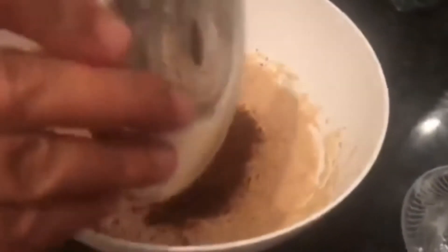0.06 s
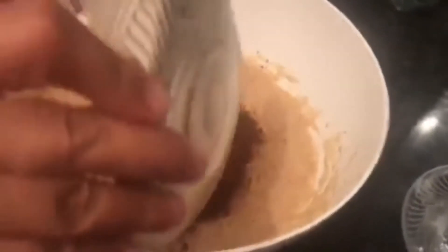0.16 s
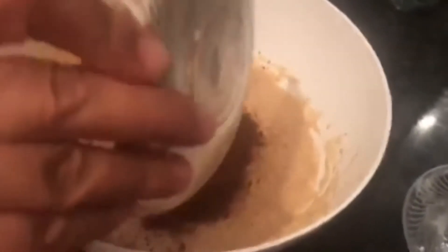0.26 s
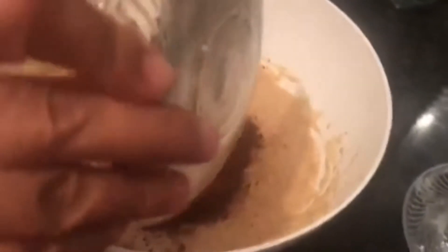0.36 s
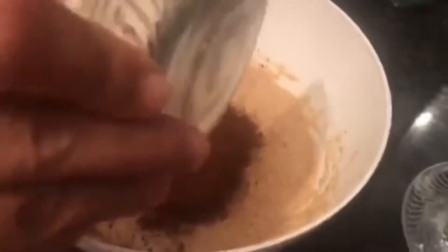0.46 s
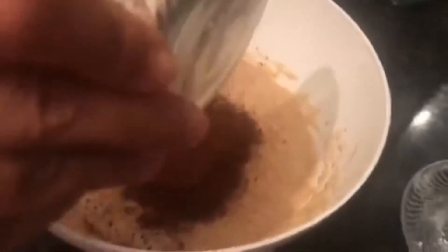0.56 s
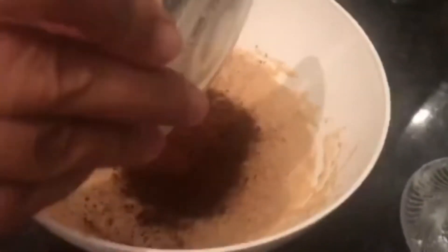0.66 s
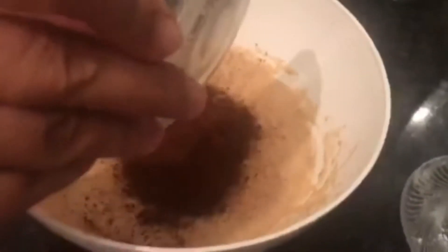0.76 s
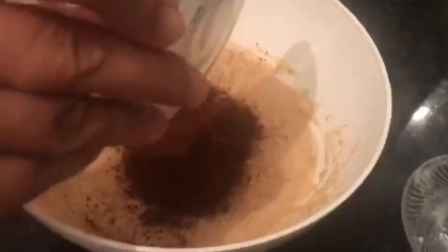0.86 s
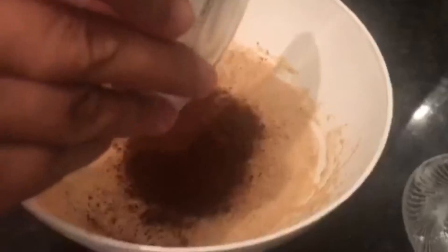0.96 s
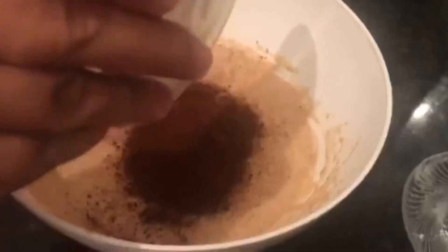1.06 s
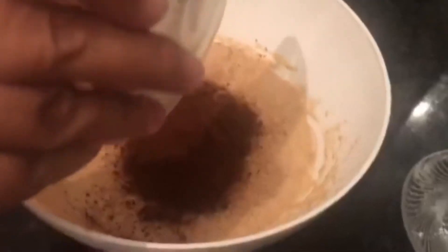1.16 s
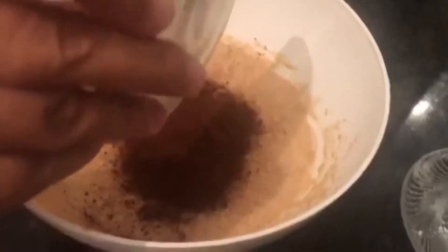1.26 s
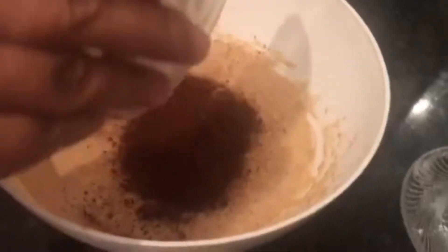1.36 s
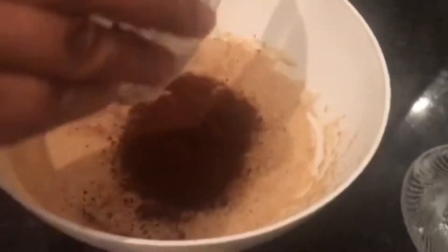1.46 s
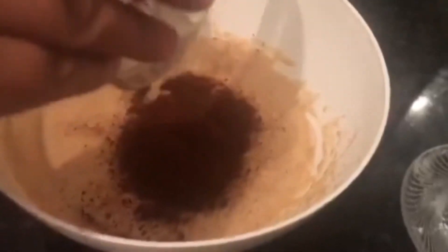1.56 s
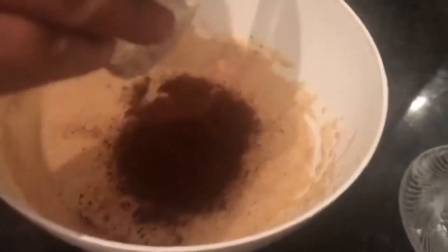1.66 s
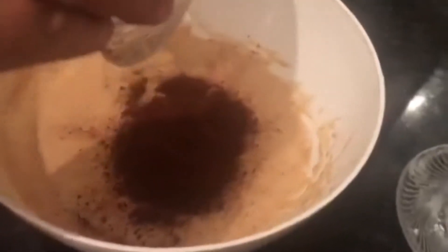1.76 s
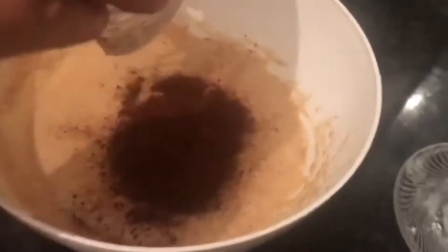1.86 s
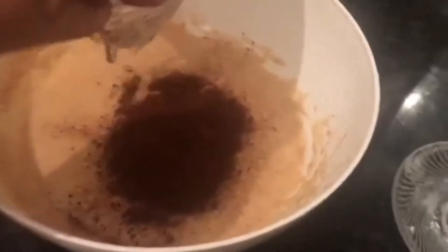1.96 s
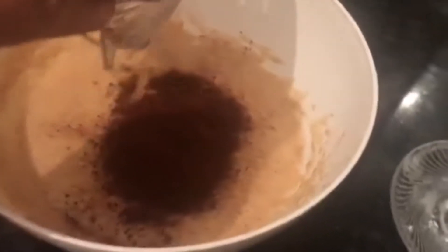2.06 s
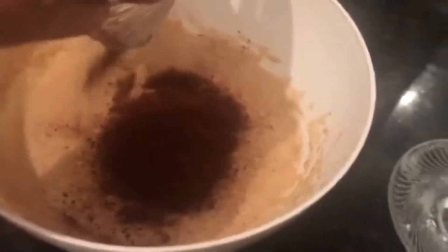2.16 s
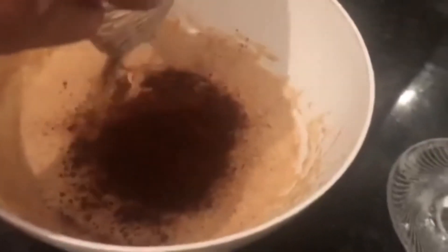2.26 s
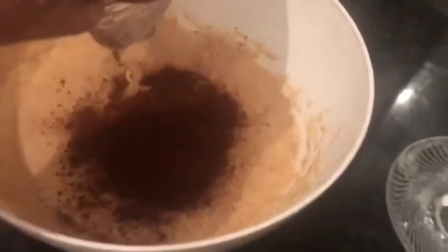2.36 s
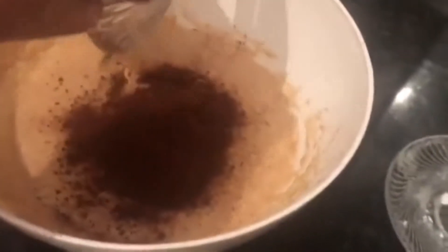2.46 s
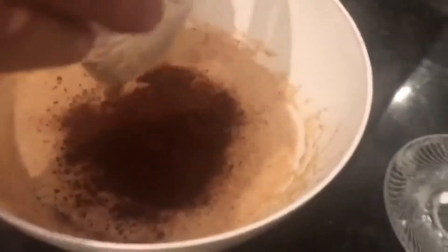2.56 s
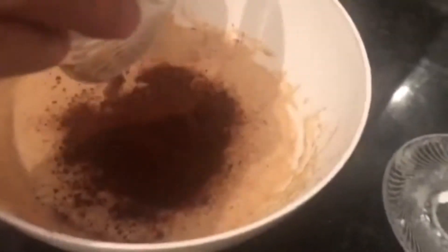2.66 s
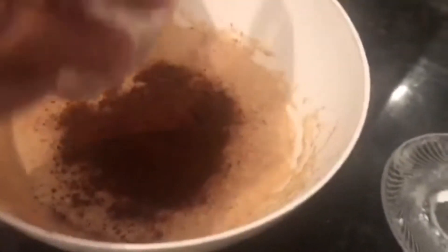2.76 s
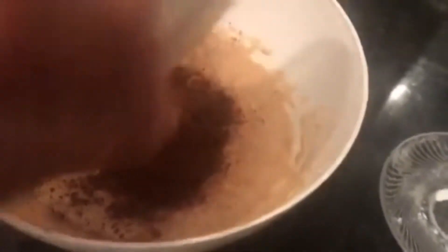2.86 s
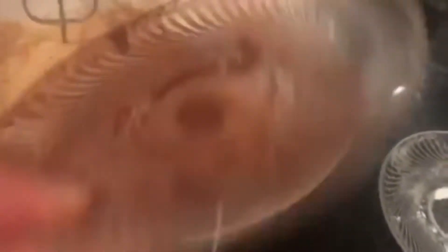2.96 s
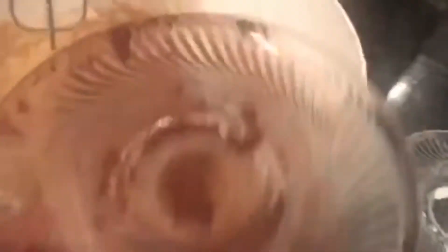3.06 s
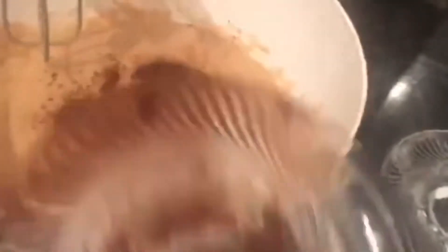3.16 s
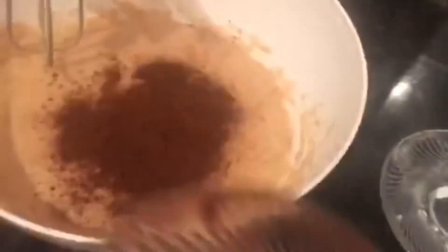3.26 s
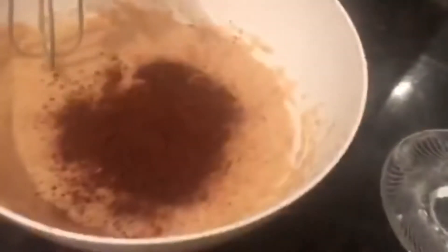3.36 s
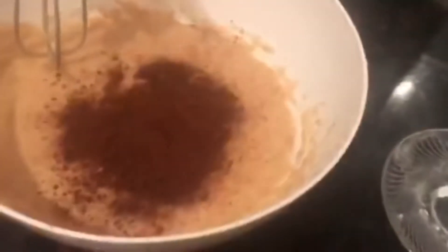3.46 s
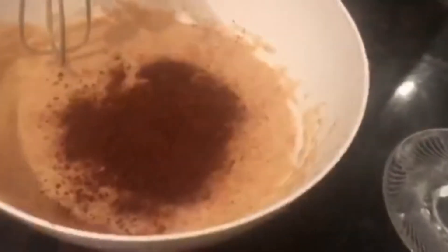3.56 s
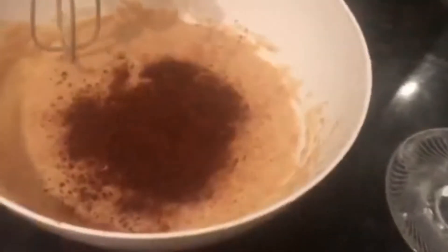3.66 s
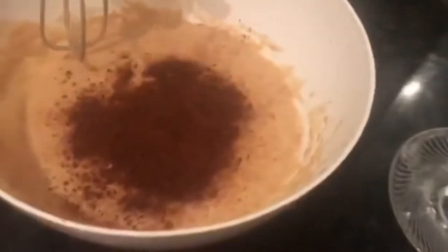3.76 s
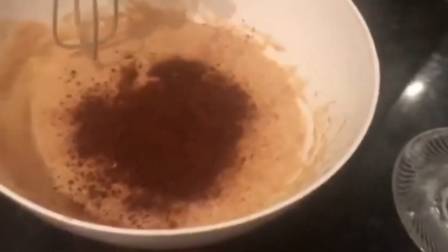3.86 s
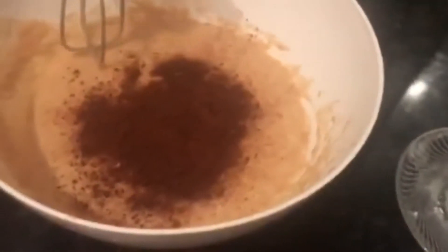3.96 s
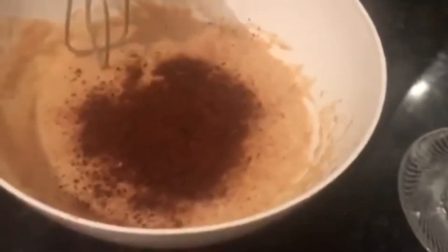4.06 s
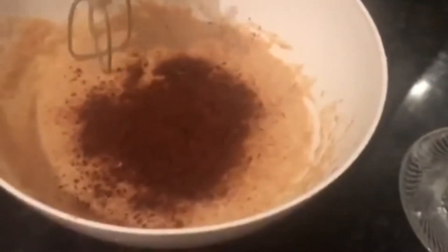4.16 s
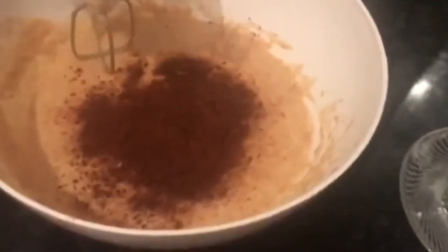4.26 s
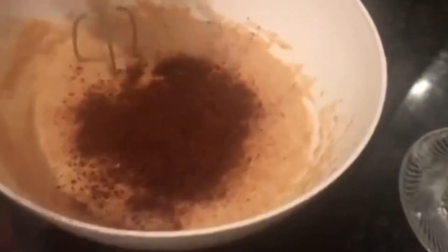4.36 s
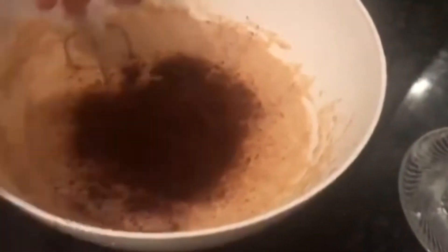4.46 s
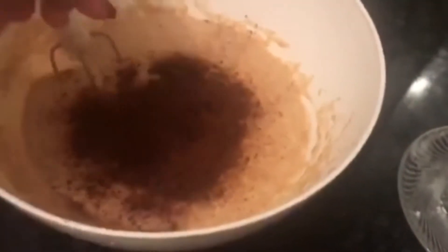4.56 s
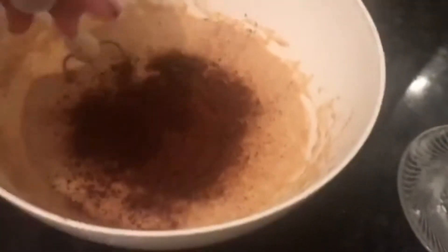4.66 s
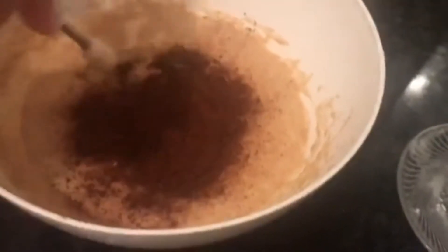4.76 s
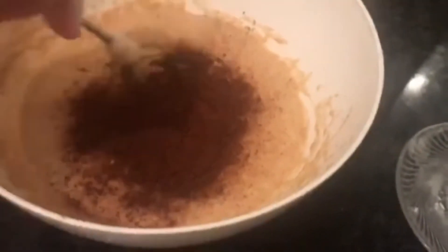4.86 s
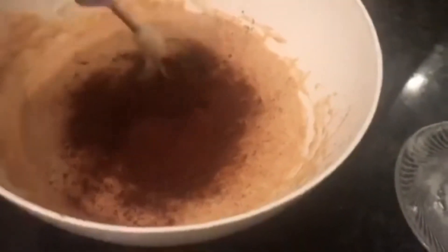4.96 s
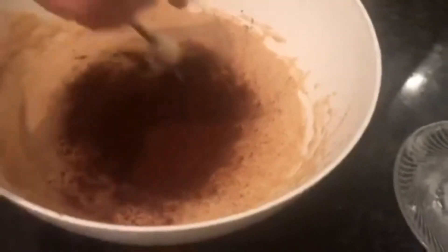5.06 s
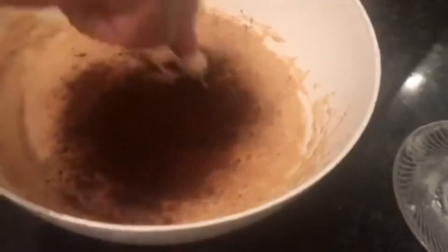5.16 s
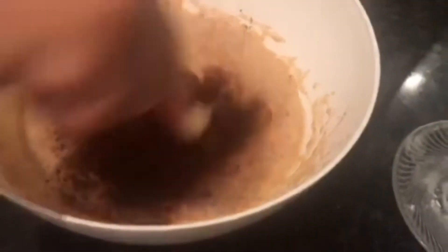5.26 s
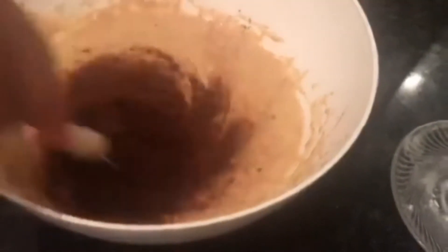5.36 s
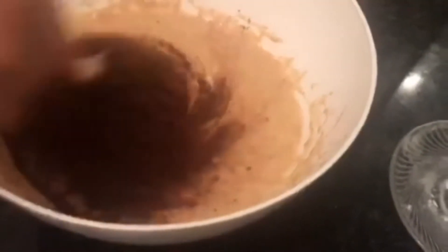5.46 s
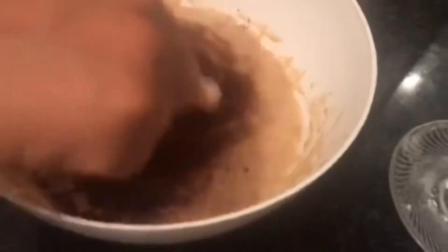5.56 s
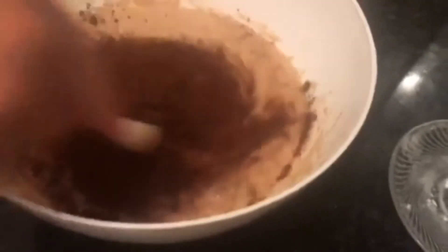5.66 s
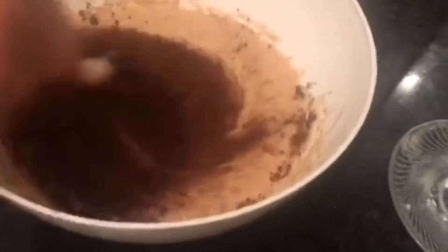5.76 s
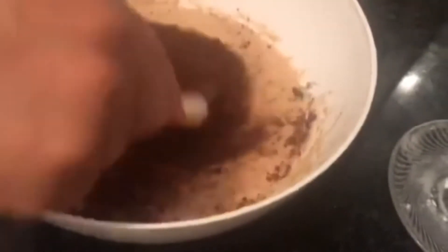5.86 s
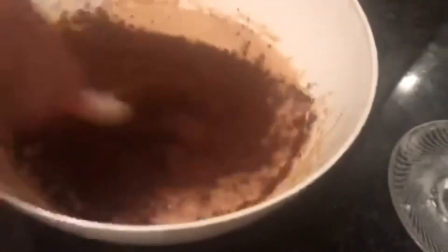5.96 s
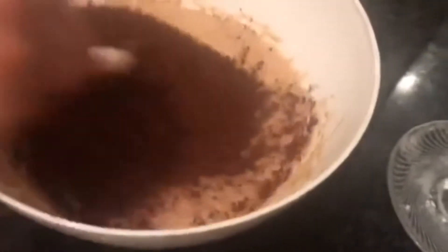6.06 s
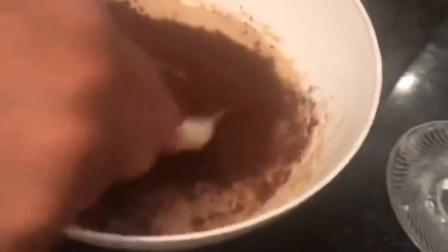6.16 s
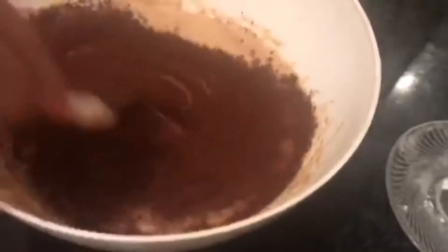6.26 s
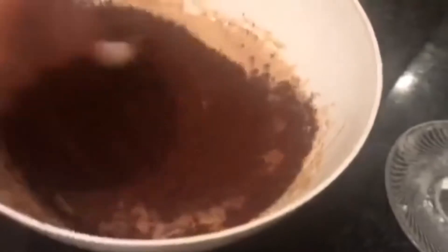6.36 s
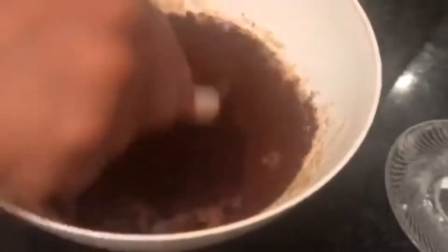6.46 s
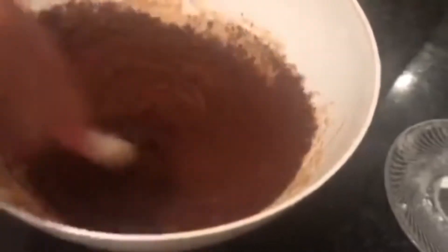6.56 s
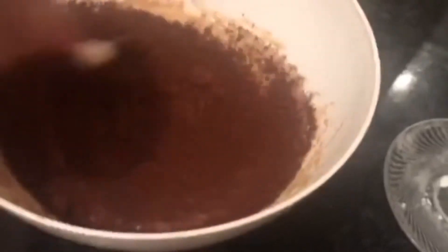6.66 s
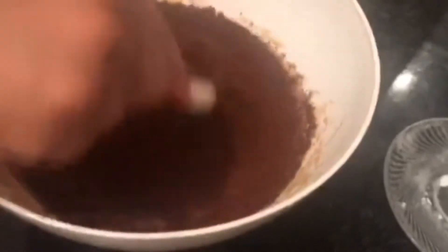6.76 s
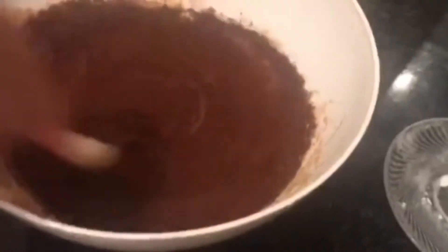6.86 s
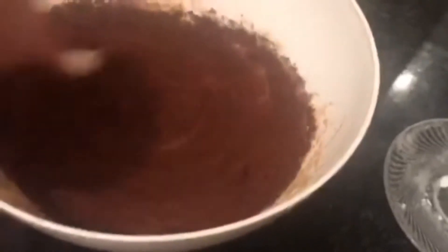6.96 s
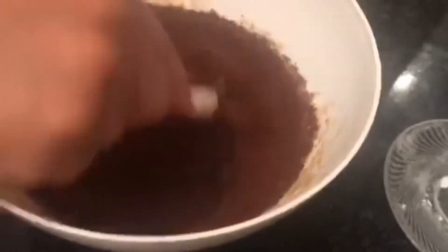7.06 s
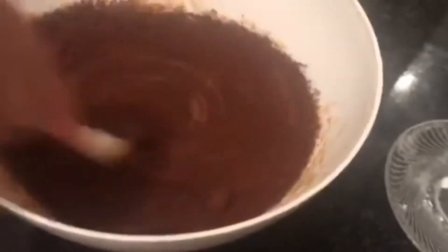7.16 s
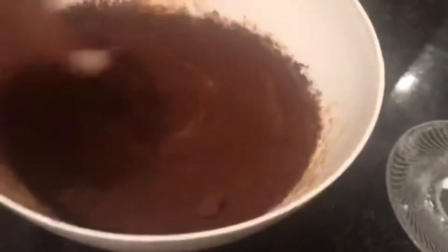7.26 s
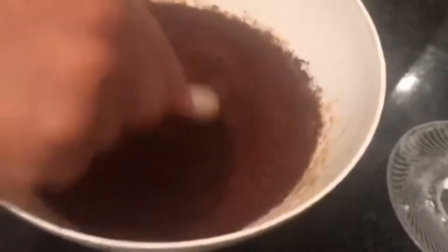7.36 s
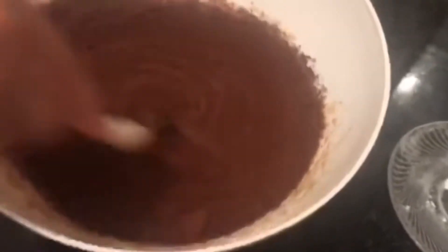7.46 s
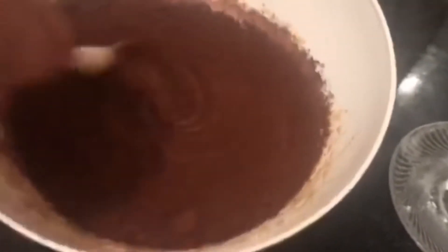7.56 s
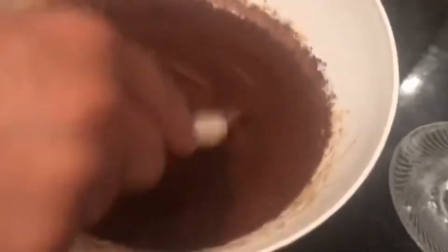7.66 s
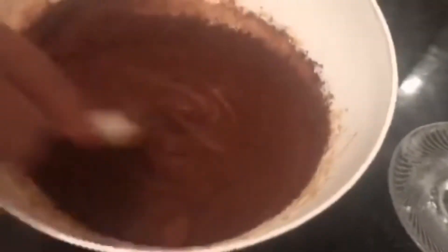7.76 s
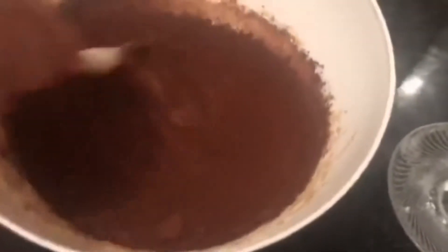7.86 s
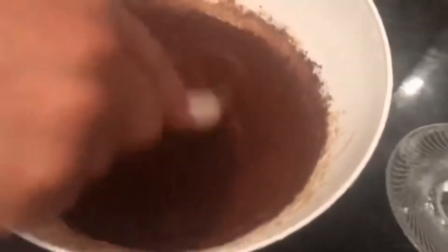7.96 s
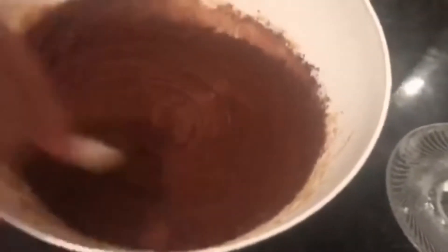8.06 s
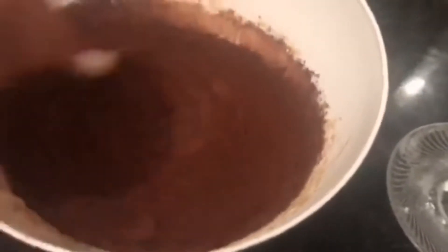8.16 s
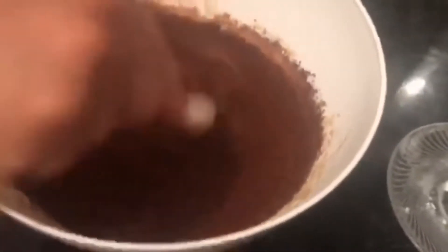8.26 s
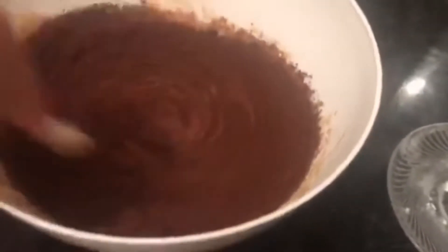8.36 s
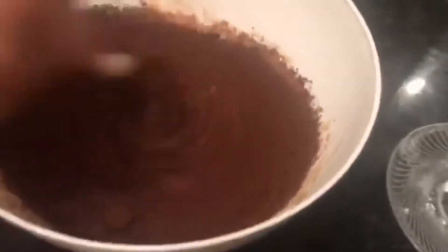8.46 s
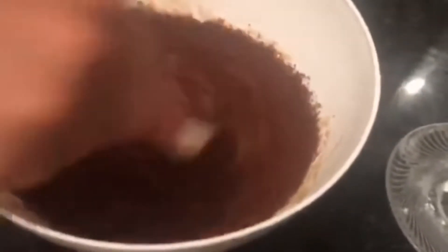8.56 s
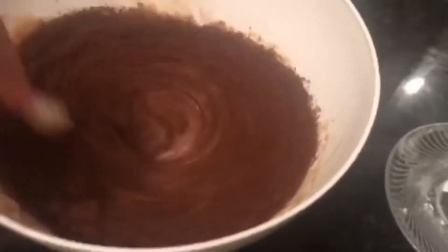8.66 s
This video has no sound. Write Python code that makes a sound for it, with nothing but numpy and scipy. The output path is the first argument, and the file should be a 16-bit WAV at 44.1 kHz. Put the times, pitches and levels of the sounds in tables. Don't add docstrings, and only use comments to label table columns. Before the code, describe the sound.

In a close, hard kitchen, a glass dish rattles brightly onto a counter, followed by increasingly vigorous hand whisking with scrapes, thuds and wet slaps.

```python
import sys
import numpy as np
from scipy import signal
from scipy.fft import rfft, irfft
from scipy.io import wavfile
from scipy.ndimage import uniform_filter1d, minimum_filter1d

SR = 44100
rng = np.random.default_rng(int(sys.argv[2]) if len(sys.argv) > 2 else 0)


def nominal_scale(level):
    x = np.asarray(level, float) / 20
    return 10 ** x


def digitize_waveform(pressure):
    field = np.atleast_2d(pressure).T
    bounded = np.clip(field, -1, 1)
    quanta = np.round(bounded * 32767).astype(np.int16)
    wavfile.write(sys.argv[1], SR, quanta)


N = 384111


def rms_one(x):
    return x / np.sqrt(np.mean(x ** 2) + 1e-20)


def add(out, s, sound):
    i = round(s * SR)
    out[i:i + len(sound)] += sound[:N - i]


def ring(hz, t60, rise_s=0.00035, since_s=0):
    t = np.arange(int(SR * (1.2 * abs(t60) + .005))) / SR
    swing = np.sin(2 * np.pi * hz * (t + since_s))
    return swing * nominal_scale(-60 * t / abs(t60)) * (1 - np.exp(-t / rise_s))


def burst(low_hz, high_hz, t60, noise, order=3):
    t = np.arange(len(noise)) / SR
    sos = signal.butter(order, [low_hz, min(high_hz, .45 * SR)], "band", fs=SR, output="sos")
    x = signal.sosfilt(sos, noise * nominal_scale(-60 * t / t60) + 1e-18)
    return x / np.abs(x).max()


def resonance(x, hz, width):
    r = np.exp(-np.pi * width / SR)
    poles = [1, -2 * r * np.cos(2 * np.pi * hz / SR), r * r]
    return signal.lfilter([(1 - r * r) / 2, 0, (r * r - 1) / 2], poles, x)


def coloured(points):
    hz, db = np.transpose(points)
    grid = np.maximum(np.arange(N // 2 + 1) * SR / N, 1)
    shape = nominal_scale(np.interp(np.log(grid), np.log(hz), db, left=-80, right=-80))
    return rms_one(irfft(rfft(rng.standard_normal(N)) * shape, N))


def flicker(rate):
    r = np.exp(-2 * np.pi * rate / SR)
    return rms_one(signal.lfilter([1], [1, -2 * r, r * r], rng.standard_normal(N + SR))[SR:])


def dish_set_downs():
    # [t/s, crack/dB, low ring/dB, middle ring/dB, upper ring/dB]
    set_downs = [
        (11, -15, [(3.6752, -7.5, -15.5, -18.5, -15), (3.678, -10.5, -14.5, -11, -9), (3.7011, -10, -13.5, -10, -22.5)]),
        (5.4, -16.5, [(3.971, -44, -62.5, -61.5, -63.5), (3.979, -24.5, -36, -34.5, -52), (3.982, -32.5, -34.5, -25, -45.5), (3.9879, -35, -37, -29, -41.5)]),
        (0.62, -10.5, [(4.0934, -18, -47.5, -48.5, -45), (4.0952, -4.5, -21, -16.5, -24), (4.1526, -8.5, -18, -10, -4.5), (4.188, -9.5, -16, -20, -25), (4.2149, -15, -17.5, -30, -16), (4.24, -26, -25.5, -33, -59)]),
    ]
    settled = [3.745, 3.999, 4.258]
    pitch_ratios = [.993, 1.046, 1.0]
    # [clatter re crack/dB, thud re crack/dB]
    counter = [(-12, -23), (-7.5, -20.5), (-8, -15.5)]
    dish_pitches = [1569, 1551, 1900, 2223, 3320, 3334, 2697, 4838, 4821, 6828, 6903, 9420]
    # [level/dB, t60/s, rise/s, ring 0-3 = low, middle, upper, top]
    dish_modes = [(0, .6, .006, 0), (-14, .3, .004, 0), (-18, .1, .001, 0), (-18, .1, .001, 0),
                  (0, .33, .002, 1), (-11, .3, .002, 1), (-10, .05, .001, 1), (2, .09, .0005, 2),
                  (-13, .16, .0005, 2), (-2, .18, .001, 3), (-8, .1, .001, 3), (4, .07, .001, 3)]
    choked_db = -32
    out = np.zeros(N)
    for ratio, settle_s, set_down, stone in zip(pitch_ratios, settled, set_downs, counter):
        damping, top_db, contacts = set_down
        clatter_db, thud_db = stone
        ends = [c[0] for c in contacts[1:]] + [settle_s]
        for (s, crack_db, *ring_db), end in zip(contacts, ends):
            hiss = rng.standard_normal(9000)
            ring_db = ring_db + [ring_db[-1] + top_db]
            add(out, s, nominal_scale(crack_db + 1.0) * burst(610, 4300, 0.0083, hiss))
            clatter = burst(830, 5200, 0.19, hiss[::-1], order=6)
            add(out, s, nominal_scale(crack_db + clatter_db) * clatter)
            add(out, s, nominal_scale(crack_db + thud_db) * burst(140, 890, 0.29, hiss))
            for hz, (db, t60, rise_s, group) in zip(dish_pitches, dish_modes):
                held = 1 + damping * t60
                tone = ring(hz * ratio, t60 / held, rise_s / held, since_s=round(s * SR) / SR)
                after_s = np.maximum(np.arange(len(tone)) / SR - (end - s), 0)
                choke = np.maximum(nominal_scale(-1500 * after_s), nominal_scale(choked_db))
                add(out, s, nominal_scale(ring_db[int(group)] + db) * tone * choke)
    return out


def touched_glass():
    # [t/s, level/dB]
    touches = [
        (3.6753, -14),
        (3.7011, -21),
        (3.982, -33.5),
        (4.0955, -46),
        (4.2165, -48),
    ]
    neighbour_pitches = [797, 587, 4152, 4441, 5173, 5229, 5534, 6019, 6519, 7402]
    # [level/dB, t60/s]
    neighbour_modes = [(-18.5, 0.35), (-26.5, 0.33), (-15, 0.32), (-21, .15), (0, 0.018), (-1, 0.11),
                       (0.5, 0.06), (-5.5, 0.023), (-11.5, 0.17), (-10.5, 0.094)]
    out = np.zeros(N)
    for s, touch_db in touches:
        for hz, (db, t60) in zip(neighbour_pitches, neighbour_modes):
            add(out, s, nominal_scale(touch_db + db) * ring(hz, t60))
    return out


def extra_glass_rings():
    # [t/s, f/Hz]
    extra_rings = [(3.7011, 9380), (4.2, 1567), (4.2, 3311), (4.153, 587.5), (4.153, 4423), (4.153, 4619),
                   (4.153, 5267), (4.153, 1858), (4.19, 6880), (4.232, 6860), (4.215, 2697), (4.247, 3316),
                   (3.91, 6900), (3.98, 9400)]
    # [level/dB, t60/s]
    extra_strengths = [(-35.5, .05), (-43, 0.8), (-40, 0.6), (-31, .25), (-32, .2), (-29.5, .11), (-34, .2),
                       (-31, .3), (-30.5, .04), (-30.5, .06), (-12.5, 0.016), (-22.5, 0.17), (-57, 0.075),
                       (-46.5, .05)]
    out = np.zeros(N)
    for (s, hz), (db, t60) in zip(extra_rings, extra_strengths):
        add(out, s, nominal_scale(db) * ring(hz, t60, .002))
    return out


def glassware():
    return (dish_set_downs() + touched_glass() + extra_glass_rings()) * nominal_scale(1.4 * flicker(70))


def knocks():
    # [t/s, peak/dB, thump f/Hz, tick re peak/dB]
    counter_knocks = [(0.0961, -45, 880, 14), (0.097, -17.5, 376, 9), (0.1035, -40, 297, -15),
                      (0.109, -16.5, 260, -16), (.125, -36, 905, -14), (0.1402, -20.5, 415, -31),
                      (.146, -29, 148, -32), (.157, -32, 198, -27), (.13, -36, 60, -42),
                      (2.613, -52, 306, 20), (2.62, -14.5, 625, -13), (2.624, -26, 185, -30),
                      (2.6333, -21.5, 170, -23), (2.637, -26.5, 480, -17), (4.7185, -47, 500, -12),
                      (4.723, -24.5, 163, -42), (4.752, -39, 202, -30), (4.95, -53, 179, -20),
                      (4.9975, -52, 900, 13.5)]
    # [t/s, peak/dB, thump f/Hz, tick re peak/dB]
    wire_strikes = [(5.3002, -35, 706, 1), (5.3941, -27, 673, -16), (5.5188, -28.5, 593, -4),
                    (5.5368, -22.5, 362, -12), (5.978, -21.5, 603, -5.5), (6.073, -31.5, 473, 16),
                    (6.2849, -21.5, 180, -6), (6.388, -39, 600, 6), (6.3967, -26, 606, -5),
                    (6.4323, -28, 700, -5), (6.6042, -24, 214, 1), (6.7032, -29, 744, 5),
                    (6.884, -39.5, 637, 0), (6.987, -47, 493, 22), (7.0198, -18, 341, -8),
                    (7.1963, -19, 700, 7.5), (7.3398, -39.5, 613, 10), (7.4197, -34.5, 344, -17),
                    (7.5025, -18.5, 550, -13), (7.6335, -14, 354, -8), (7.7868, -13, 700, -22),
                    (7.896, -22, 690, -14), (7.9981, -32, 564, -20), (8.0422, -25, 320, -3),
                    (8.2433, -43.5, 607, -1), (8.301, -20, 278, -10), (8.3698, -33.5, 360, 4),
                    (8.4895, -17, 597, -14), (8.573, -34.5, 275, 3), (8.6478, -27.5, 760, 8.5)]
    # [t/s, peak/dB, thump f/Hz]
    batter_slaps = [(5.3259, -42, 359), (5.435, -41, 154), (5.9833, -26.5, 255), (6.062, -28.5, 240),
                    (6.1257, -32.5, 465), (6.418, -38, 330), (6.4333, -25.5, 220), (6.472, -36, 90),
                    (7.029, -37, 60), (8.309, -46, 60), (8.5, -43, 55), (8.569, -42, 60),
                    (6.7268, -28, 304), (6.7624, -48, 581), (6.901, -34, 576), (7.047, -50, 330),
                    (7.234, -34, 559), (7.3532, -32.5, 403), (7.8196, -40.5, 279), (7.96, -40, 306),
                    (8.1115, -18.5, 291), (8.4126, -18, 283), (8.5047, -25.5, 406), (8.682, -46, 256)]
    # [f/Hz, level/dB, t60/s]
    bowl_modes = [(170, -2.5, 0.11), (191.3, 0, 0.095), (267.5, 0.5, 0.072), (360, 3.5, 0.047),
                  (430, 0.5, 0.042), (548.1, -4.5, 0.23), (607.6, -5, 0.17), (683.5, 3, 0.051),
                  (740, -4, 0.1), (839, -7, 0.069), (1188, 17, 0.0063), (1299, -11, 0.12),
                  (2114, -2, 0.046)]
    slaps = [(s, db, hz, -61 + .3 * (db + 47) - db) for s, db, hz in batter_slaps]
    blows = list(counter_knocks) + list(wire_strikes) + slaps
    out, t = np.zeros(N), np.arange(9000) / SR
    for k, (s, db, thump_hz, tick_db) in enumerate(blows):
        hiss = rng.standard_normal(2500)
        shift, *luck = rng.standard_normal(len(bowl_modes) + 1)
        ring_db = -37.5 + 0.74 * (db + 29.5) - db
        if k < len(counter_knocks):
            ring_db -= 3
        turns = thump_hz * t + 2600 * 0.001185 * (1 - np.exp(-t / 0.0011))
        tick = nominal_scale(min(tick_db, 0)) * np.exp(-t / 0.0035) * (1 - np.exp(-t / 0.00038))
        swell = 1 - np.exp(-(t / 0.0045) ** 2)
        thump = np.sin(2 * np.pi * turns) * (tick + swell) * nominal_scale(-60 * t * thump_hz / 8)
        add(out, s - .0015, nominal_scale(db) * thump)
        add(out, s - .001, nominal_scale(db + tick_db - 17.0) * burst(1500, 9400, 0.017, hiss))
        add(out, s, nominal_scale(db + tick_db - 7) * burst(660, 4300, 0.013, hiss[::-1]))
        wet_slap = burst(0.55 * thump_hz, 1.72 * thump_hz, 0.067, hiss)
        add(out, s, nominal_scale(db + ring_db - 5.5) * wet_slap)
        for (hz, mode_db, t60), chance in zip(bowl_modes, luck):
            near_db = -5 * abs(np.log2(hz / thump_hz))
            gain = np.sign(chance) * nominal_scale(db + ring_db + mode_db + near_db + 4.3 * chance)
            add(out, s, gain * ring(hz * (1 + 0.021 * shift), t60, 0.00071))
    return out


def ticks():
    # [t/s, peak/dB, f/Hz, t60/s]
    lone_ticks = [(0.096, -21.5, 1840, 0.0088), (.118, -36, 1260, 0.092), (.39, -55, 1800, 0.018),
                  (0.871, -51, 1050, 0.16), (1.66, -48, 1210, 0.015), (2.199, -50, 4970, 0.0077),
                  (2.25, -59, 4380, .03), (2.74, -60, 2500, .01), (2.752, -59, 3330, .01),
                  (2.747, -46, 4500, 0.012), (2.763, -59.5, 5200, 0.012), (2.88, -45, 595, 0.12),
                  (2.96, -44, 615, 0.24), (2.983, -55.5, 7200, .03), (2.996, -55, 5200, .02),
                  (3.652, -55.5, 3420, 0.0091), (3.652, -44, 5000, 0.015), (4.634, -43.5, 1230, 0.038),
                  (4.998, -44.5, 1340, .012), (5.105, -45, 1990, 0.01), (6.838, -45, 1680, 0.006),
                  (6.572, -41, 3480, 0.0081), (6.527, -50, 1650, .01), (7.46, -25.5, 3180, 0.015),
                  (8.452, -44, 1350, .01), (5.149, -42.5, 476, 0.39), (5.319, -31, 1860, 0.015),
                  (5.365, -39.5, 3120, 0.01), (5.505, -33.5, 3470, 0.0088), (6.821, -37.5, 2370, 0.0056),
                  (8.089, -26.5, 1260, 0.0098), (8.09, -31, 2500, 0.0078), (8.574, -31, 1590, 0.027),
                  (8.602, -26.5, 1830, 0.011)]
    out = np.zeros(N)
    for s, db, hz, t60 in lone_ticks:
        rustle = burst(0.57 * hz, 1.093 * hz, 0.055, rng.standard_normal(2500))
        add(out, s, nominal_scale(db - 4.5 - 61 * t60) * rustle)
        add(out, s, nominal_scale(db) * ring(hz, t60, t60 / 12))
    return out


def stirring():
    # [t/s, level/dB]
    effort = [(4.502, -81.5), (5.27, -71.5), (5.499, -65.5), (5.78, -68), (5.939, -64), (6.16, -63),
              (6.28, -52.5), (6.43, -71), (6.531, -66), (6.8, -66.5), (7.0, -70), (7.11, -64.5), (7.3, -65),
              (7.41, -63.5), (7.7, -58), (8.0, -62.5), (8.35, -60.5), (8.71, -55.5)]
    # [middle t/s, length/s, scrape/dB]
    strokes = [(4.609, 0.095, -68), (4.764, 0.074, -70), (4.866, 0.084, -70), (5.032, 0.06, -71),
               (5.12, 0.033, -78), (5.226, 0.031, -64.5), (5.345, 0.15, -62.5), (5.516, 0.07, -49),
               (5.675, 0.079, -53.5), (5.926, 0.039, -50.5), (5.98, 0.058, -64), (6.088, 0.032, -41.5),
               (6.244, 0.054, -43), (6.406, 0.11, -51), (6.592, 0.063, -50), (6.719, 0.081, -51.5),
               (6.89, 0.11, -59.5), (7.019, 0.079, -46), (7.198, 0.061, -48.5), (7.316, 0.093, -44.5),
               (7.477, 0.067, -42), (7.611, 0.057, -42), (7.761, 0.059, -43), (7.896, 0.039, -46.5),
               (8.063, 0.079, -48), (8.222, 0.079, -42), (8.488, 0.063, -45.5), (8.676, 0.034, -59)]
    stroke_hiss = [4, 6, 5.5, 10, -8, -2, 4.5, -8, -1, -1, -8, -5, -7, -7, -2, -1, 13, -1, 2, -2, 3, -11,
                   -11, -9, 5, -1, 4, 1]
    # [f/Hz, width/Hz, level/dB]
    wall_modes = [(1020, 860, -2.5), (1260, 460, -18), (1426, 130, -0.5), (2100, 240, -2), (2500, 120, -7),
                  (2888, 250, 6), (3236, 450, 0.5), (3780, 190, 2), (4350, 280, -4.5), (4400, 1100, -6),
                  (5000, 560, -15), (5380, 600, -6.5), (6030, 440, -4.5), (6576, 850, -9.5),
                  (6700, 240, -11.5), (8010, 470, -15), (8650, 510, -9.5)]
    # [f/Hz, level per Hz/dB]
    rumble_spectrum = [(71, -62), (120, -9.5), (368, -1), (436, -9.5), (631, 1.5), (993, -14.5), (1500, -7),
                       (1950, -53.5), (3300, -120)]
    t = np.arange(N) / SR
    s, drag_db = np.transpose(effort)
    drag = nominal_scale(np.interp(t, s, drag_db, left=-120))
    low, middle, top = drag.copy(), drag.copy(), drag * nominal_scale(-8.5)
    for (middle_s, length_s, db), hiss_db in zip(strokes, stroke_hiss):
        low_db = -4.5 - 0.17 * (db + 54.5)
        swell = np.exp(-np.log(2) * np.abs(np.linspace(-2, 2, int(2 * length_s * SR))) ** 2.5)
        for band, share_db in (low, low_db), (middle, 0), (top, -17 + hiss_db):
            add(band, middle_s - length_s, nominal_scale(db + share_db) * swell)

    slip_now = rng.random(N) < 5000 / SR
    slip_size = nominal_scale(3.1 * np.minimum(rng.exponential(1, N), 5))
    slips = slip_now * slip_size * rng.choice([-1, 1], N) * nominal_scale(1.2 * flicker(68))
    bands = np.zeros((3, N))
    for k, (hz, width, db) in enumerate(wall_modes):
        fade = nominal_scale(db + 2.6 * flicker(33) + 1.7 * flicker(3.7))
        mode = resonance(np.roll(slips, SR // 900 * k), hz, width)
        bands[np.searchsorted([1900, 6500], hz)] += (-1) ** k * fade * mode
    scrape = low * rms_one(bands[0]) + middle * rms_one(bands[1]) + top * rms_one(bands[2])

    rumble_db = -54.5 + 0.97 * (drag_db + 65)
    rumble = rms_one(coloured(rumble_spectrum) * nominal_scale(6.1 * flicker(37)))
    return scrape + nominal_scale(np.interp(t, s, rumble_db, left=-120)) * rumble


def kitchen(x):
    t60_s, lows_cut_hz = 0.35, 3150
    t = np.arange(int(.6 * SR)) / SR
    lows, highs = rng.standard_normal((2, len(t))) * (t > .006)
    lows = signal.sosfilt(signal.butter(2, lows_cut_hz, fs=SR, output="sos"), lows)
    tail = (lows + .5 * highs) * nominal_scale(-60 * t / t60_s)
    return signal.fftconvolve(x, tail / np.sqrt(np.sum(tail ** 2)))[:N]


def room_air():
    # [f/Hz, level per Hz/dB]
    air_spectrum = [(16, -41.5), (28, -20), (49, -6), (70, -16), (101, 1), (126, -13), (225, -15),
                    (287, -15), (403, -21), (489, -18.5), (876, -26.5), (1060, -26.5), (1290, -31),
                    (9200, -48), (12000, -76.5), (20200, -120)]
    # [f/Hz, width/Hz, level/dB]
    drone_bands = [
        (93, 5.1, -62.5),
        (923, 25, -71.5),
        (2570, 43, -86),
        (4600, 43, -87),
    ]
    out = nominal_scale(-54) * coloured(air_spectrum)
    for hz, width, db in drone_bands:
        out += nominal_scale(db) * rms_one(resonance(rng.standard_normal(N), hz, width))
    return out


def scene():
    glass, bowl = glassware(), knocks() + ticks() + stirring()
    dull = signal.sosfilt(signal.butter(1, 2600, fs=SR, output="sos"), bowl)
    scattered = glass * nominal_scale(-7 + 4.5 * flicker(75))
    return (glass + bowl + nominal_scale(-12.5) * kitchen(dull + scattered) + room_air())[None]


def dropouts(x, below_db):
    hz, _, cells = signal.stft(x, SR, nperseg=1024)
    band = uniform_filter1d(uniform_filter1d(np.abs(cells) ** 2, size=3, axis=0), size=3, axis=1)
    band_db = 10 * np.log10(band + 1e-20)
    around_db = uniform_filter1d(uniform_filter1d(band_db, size=36, axis=0), size=5, axis=1)
    thrift_db = np.interp(hz, [2500, 4400, 5000, 5600, 6800, 7600, 8600, 9000, 9250],
                          [-6, -2, -1.2, -1.5, .4, 1.2, .3, 1, 9])
    lost = band_db < around_db + below_db + thrift_db[:, None]
    loudest_db = -minimum_filter1d(-band_db, size=64, axis=0)
    lost |= (band_db < loudest_db - 30) & (hz[:, None] > 5400)
    return signal.istft(cells * np.where(lost, .05, 1), SR, nperseg=1024)[1][:N]


def band_limit(x):
    return signal.sosfilt(signal.butter(12, 10790, fs=SR, output="sos"), x)


def record(dry):
    rounded = .9 * np.tanh(dry / .9)
    top_cut = signal.cheby2(12, 70, 10830, fs=SR, output="sos")
    thinned = dropouts(signal.sosfilt(top_cut, rounded)[0], below_db=-3.1)
    return band_limit(thinned[None])


dry = scene()
out = record(dry)
digitize_waveform(out)
```